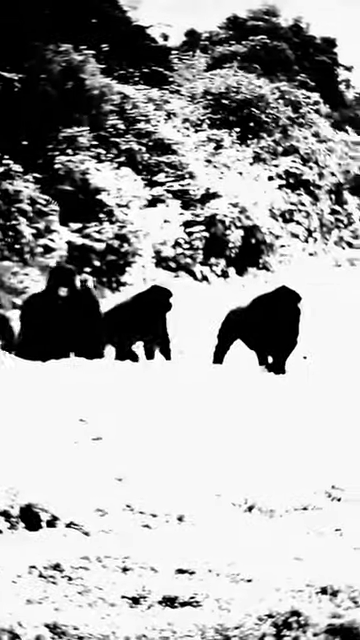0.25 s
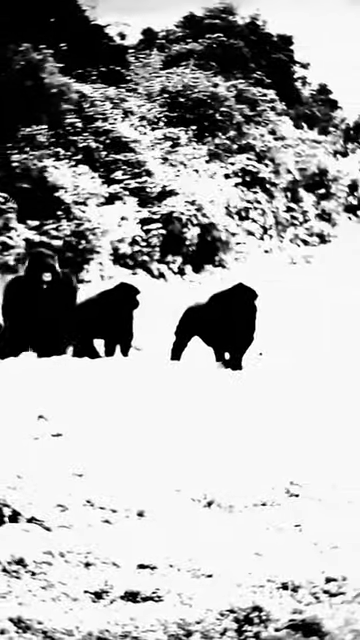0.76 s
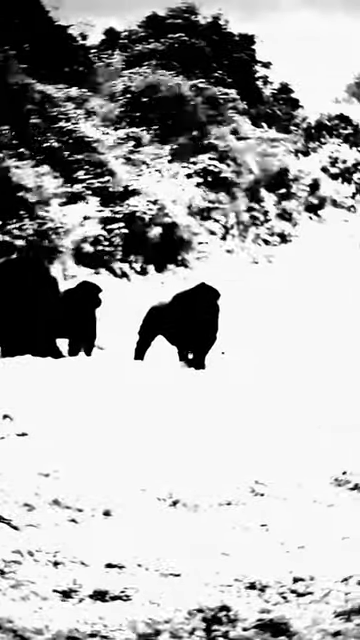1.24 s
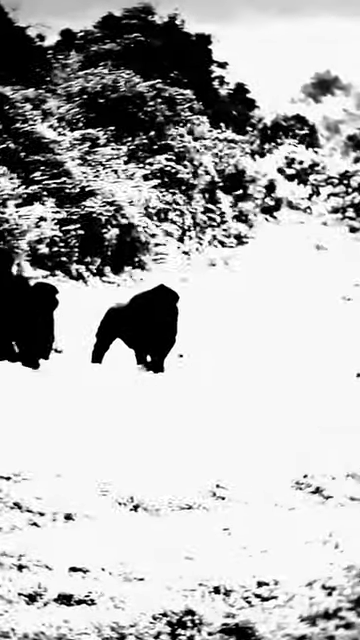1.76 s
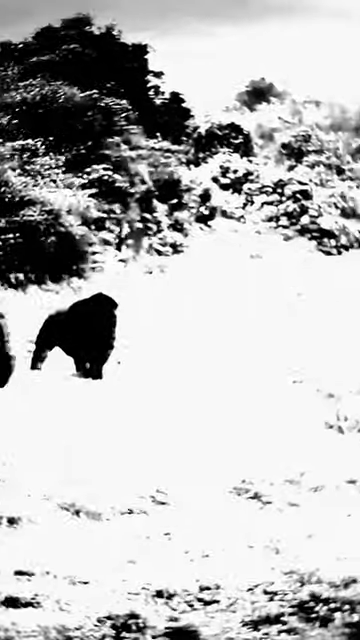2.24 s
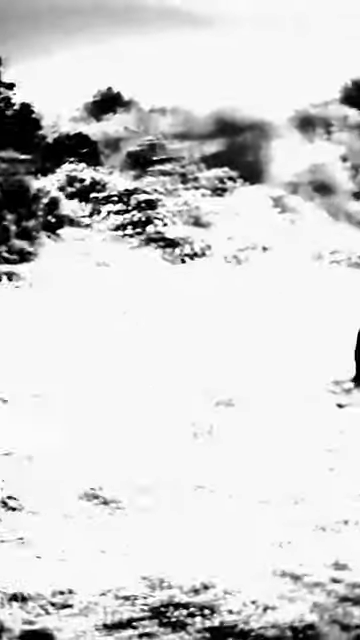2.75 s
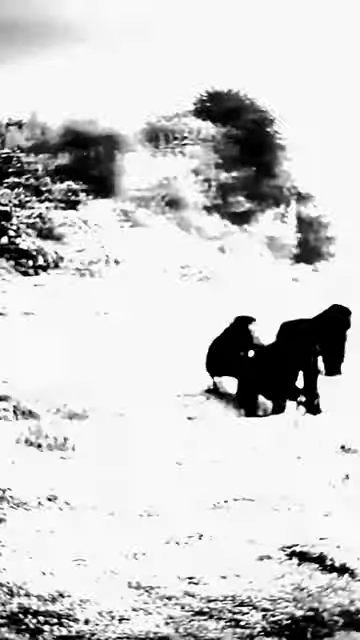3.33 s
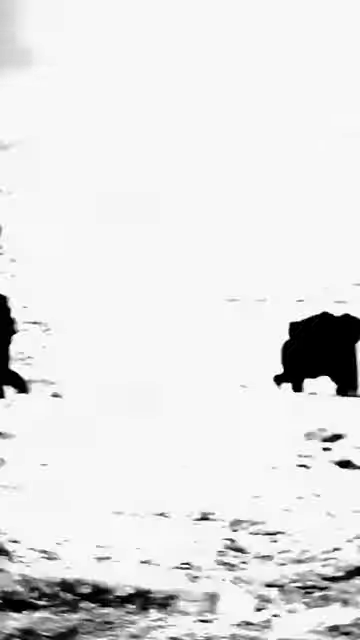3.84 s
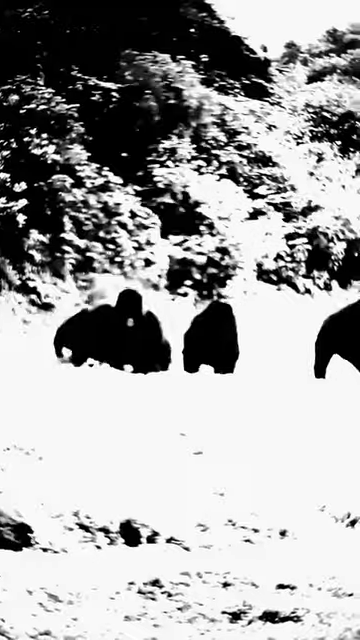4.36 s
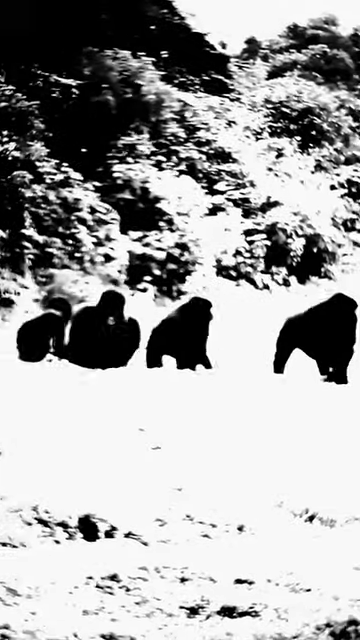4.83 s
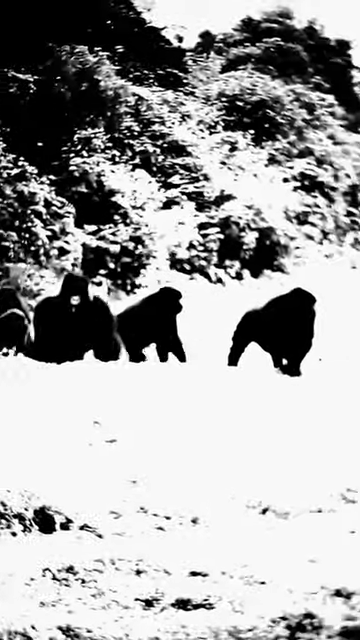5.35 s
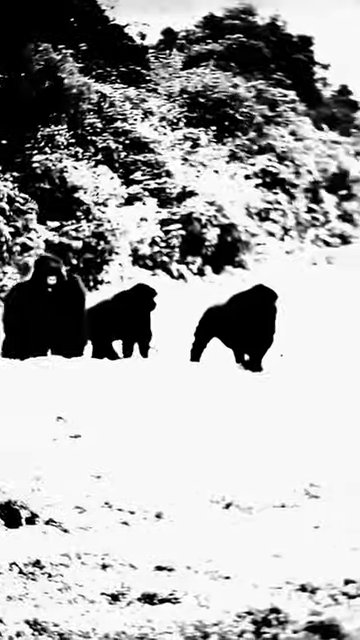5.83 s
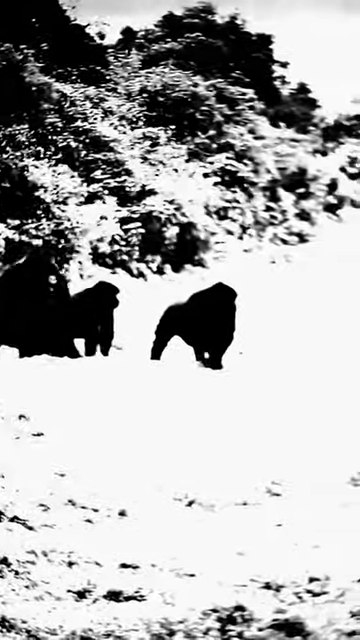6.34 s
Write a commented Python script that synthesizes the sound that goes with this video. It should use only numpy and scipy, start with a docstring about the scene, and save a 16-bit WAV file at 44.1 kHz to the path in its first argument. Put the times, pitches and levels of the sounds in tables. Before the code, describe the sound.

Outdoors, several gorillas argue: sharp raspy coughs and hoarse barks with brief whistling cracks, about two seconds of building calls, then two harsh nasal screams back to back. The outburst breaks into coughs, a thin whine and near quiet, before low grunts and a repeat of the opening barks. Grass rustles faintly, bushes return a dull weak echo, and the calls lean to the right of a stereo microphone.

```python
"""Gorillas quarrelling on open grass

Before a wall of bushes, coughing barks and hoarse hoots build into two long screams.
Each call is turbulent air, shaken by chaotic folds, ringing in a moving throat; the bushes return a faint echo.
The opening volley of barks comes round again at the end. A low hum and rumble lie underneath.
Everything skims the ground to two microphone ports, except the air bed and the scatter of nearby tufts."""
import sys
import numpy as np
from scipy import signal
from scipy.fft import rfft, irfft, next_fast_len
from scipy.io import wavfile
from scipy.ndimage import uniform_filter1d, minimum_filter1d

SR = 44100
rng = np.random.default_rng(int(sys.argv[2]) if len(sys.argv) > 2 else 0)


def persist_wave(psi):
    """Save psi, clipped to +-1, as 16-bit WAV."""
    counts = np.round(np.clip(psi, -1, 1) * 32767).astype(np.int16)
    wavfile.write(sys.argv[1], SR, np.atleast_2d(counts).T)


N = 290619
TIME = np.arange(N) / SR


def amp(db):
    """Decibels to gain."""
    return 10 ** (np.asarray(db) / 20)


def evened(x):
    """Scales to unit rms."""
    return x / np.sqrt(np.mean(x ** 2) + 1e-20)


def steadied(x, size=1100):
    """Unit rms from moment to moment, leaving the fast grain."""
    power = uniform_filter1d(uniform_filter1d(x ** 2, size), size // 2)
    return x / np.sqrt(power + 1e-12)


def read(points, hz):
    """Reads a spectrum table on a log-frequency axis."""
    f, value = np.transpose(points)
    return np.interp(np.log(hz + 1), np.log(f + 1), value)


def follow(rows):
    """Start time and the columns of a curve table, sample by sample."""
    s, *columns = np.transpose(rows)
    t = np.arange(s[0], s[-1], 1 / SR)
    return s[0], [np.interp(t, s, c) for c in columns]


def add(mix, s, sound):
    """Mixes a sound in at time s."""
    part = mix[max(round(s * SR), 0):][:len(sound)]
    part += sound[:len(part)]


def coloured(x, points):
    """Filters by a spectrum table."""
    size = next_fast_len(len(x) + 2048)
    gain = amp(read(points, np.fft.rfftfreq(size, 1 / SR)))
    return irfft(rfft(x, size) * gain, size)[:len(x)]


def faded(x, size=130):
    """Softens both ends of a sound over the given number of samples."""
    return x * signal.windows.tukey(len(x), min(1, 2 * size / len(x)))


def wander(n, rate_hz):
    """Smooth chance of about unit rms, up to about the given rate."""
    size = 2 ** int(np.ceil(np.log2(max(n, SR))))
    fall = np.exp(-(np.fft.rfftfreq(size, 1 / SR) / rate_hz) ** 2)
    return evened(irfft(rfft(rng.standard_normal(size)) * fall))[:n]


def turning(hz):
    """Phase in radians of a moving pitch."""
    return 2 * np.pi * np.cumsum(hz) / SR


def resonate(x, hz, width, order=2):
    """A moving resonance at steady level: shift hz down to zero, smooth, shift back."""
    turn = np.exp(1j * turning(hz * np.ones(len(x))))
    r = np.exp(-np.pi * width / SR)
    z = x / turn
    for _ in range(order):
        z = signal.lfilter([1 - r], [1, -r], z)
    return steadied((turn * z).real)


def rough_air(n, flutter_hz, flutter_db, pitch_hz=400, voiced=0., jitter=.075, drift_hz=27, tremor=0.0157):
    """Turbulence chopped into uneven puffs, mixed with the pulses of chaotic folds."""
    phase = turning(pitch_hz * (1 + jitter * wander(n, drift_hz) + tremor * wander(n, 248.7)))
    # the throat smears each pulse
    folds = evened(sum(np.cos(k * phase + k * k) for k in range(1, 14)))
    air = np.sqrt(1 - voiced) * rng.standard_normal(n) + 0.5345 * np.sqrt(voiced) * folds
    return air * amp(flutter_db * np.clip(wander(n, flutter_hz), -2, 2))


def husky(hz, level, width):
    """Rough air held in one narrow resonance."""
    air = rough_air(len(hz), flutter_hz=90, flutter_db=3)
    return faded(amp(level) * resonate(air, hz, width, order=3))


def swell(rise, hold, fall, edge_db=-30):
    """Level in dB of a short call, from edge_db under its peak: a rounded rise, a hold and an even fall."""
    t = np.arange(0, rise + hold + fall, 1 / SR)
    rising = np.maximum(1 - t / rise, 0) ** 1.76
    return edge_db * (rising + np.maximum(t - rise - hold, 0) / fall)


def arch(length, db, ends_db=-13):
    """Level in dB of a soft sound that is fullest in its middle."""
    return db + ends_db * np.linspace(-1, 1, int(length * SR)) ** 2


# Breath hissing at the teeth: freq_hz, level_db
HISS_SPECTRUM = [(3000, -34), (3700, 6.5), (4300, -0.5), (4900, -6.5), (5600, 2.5), (6300, -3.5),
                 (7000, -0.5), (7700, -8.5), (8500, -7), (9000, -20), (10300, -30.5), (12000, -40),
                 (15500, -45.5)]
# The chest heard through the body: freq_hz, level_db
CHEST_SPECTRUM = [(60, -42.5), (140, -20.5), (230, -3.5), (330, 1.5), (520, 3.5), (750, -6.5),
                  (1100, -11.5), (2000, -47.5)]


def call(controls, mouth_width, middle_hz, middle_width, upper_width, flutter_hz, flutter_db, pitch_hz,
         voiced, quiver, strain, mouth_db, middle_db, upper_db, edge_db, chest_db, hiss_db):
    """Rough air rings four throat resonances and the chest, and hisses past the teeth."""
    level, mouth_hz, upper_hz, mouth, upper, chest, hiss = controls
    n = len(level)
    air = rough_air(n, flutter_hz, flutter_db, pitch_hz, voiced)
    shake = 1 + quiver * wander(n, 58)  # the strained throat trembles
    throat = amp(mouth + mouth_db) * resonate(air, mouth_hz * shake, mouth_width, order=3)
    throat += amp(middle_db) * resonate(air[::-1], middle_hz * shake, middle_width, order=4)
    throat += amp(upper + upper_db) * resonate(air, upper_hz * shake, upper_width, order=3)
    # the fourth gives the bite
    throat += amp(upper + edge_db) * resonate(air[::-1], 1.2824 * upper_hz * shake, 910, order=3)
    # folds driven to their limit flatten the strongest surges
    surge = uniform_filter1d(steadied(throat) ** 2, size=60) + 0.28
    throat *= surge ** (-strain / 2)
    for spectrum, db in [(CHEST_SPECTRUM, chest + chest_db), (HISS_SPECTRUM, hiss + hiss_db)]:
        throat += amp(db) * steadied(coloured(rough_air(n, flutter_hz, flutter_db), spectrum))
    return faded(amp(level) * throat, size=220)


# As effort drops, mouth resonance, chest and hiss fade more slowly: dB kept per dB lost
MOUTH_KEEPS, CHEST_KEEPS, HISS_KEEPS = 0.153, 0.09, 0.033
FULL_EFFORT_DB = -21.5


def short_controls(rise, hold, fall, db, first_hz, last_hz, mouth, upper, chest, hiss,
                   first_upper_hz, last_upper_hz):
    """One push of air: the resonances glide, and the sound is duller at its soft ends."""
    effort = swell(rise, hold, fall)
    n = len(effort)
    mouth_hz = np.linspace(first_hz, last_hz, n)
    upper_hz = np.linspace(first_upper_hz, last_upper_hz, n)
    return (db + effort, mouth_hz, upper_hz, mouth - MOUTH_KEEPS * effort, upper,
            chest - CHEST_KEEPS * effort, hiss - HISS_KEEPS * effort)


# Open air around the microphone, shape only: freq_hz, level_db
AIR_SPECTRUM = [(59, -30.5), (100, 9), (127, 6.5), (158, -14), (212, -5), (417, -16.5), (647, -2),
                (913, -1), (1440, -9), (1880, -17), (2230, -11.5), (3150, -8), (4250, -33.5), (5520, -55),
                (9350, -120)]
# Low rumble, shape only: freq_hz, level_db
RUMBLE_SPECTRUM = [(10, -34), (25, -10.5), (37, -1), (50, -9), (90, -7.5), (150, -22.5), (400, -50),
                   (1000, -76.5)]
# Strength of the bed before trims: time_s, rumble_level_db, hum_level_db
BED_LEVELS = [(0.0, -53, -54), (1, -54.5, -59.5), (1.9, -57, -57), (2.7, -65, -61.5), (4.85, -76.5, -65),
              (5.1, -64.5, -58), (6.59, -61, -61.5)]


def background(air_db=-65, hum_hz=60.1, hum_trim_db=0.0, rumble_trim_db=-1):
    """Faint outdoor air, a low rumble and a wavering hum."""
    s, rumble_level, hum_level = np.transpose(BED_LEVELS)
    air = np.array([evened(coloured(rng.standard_normal(N), AIR_SPECTRUM)) for _ in range(2)])
    air *= amp(air_db) * amp([[-4], [3]])  # left, right
    shared, apart = (evened(coloured(rng.standard_normal(N), RUMBLE_SPECTRUM)) for _ in range(2))
    rumble = shared + .25 * np.array([apart, -apart])
    rumble *= amp(np.interp(TIME, s, rumble_level) + rumble_trim_db)
    hum = evened(np.sin(turning(hum_hz + 1.0 * wander(N, 5.3))) * amp(2 * wander(N, 7.6)))
    return air + rumble + amp(np.interp(TIME, s, hum_level) + hum_trim_db) * hum


# Grass and leaves, shape only: freq_hz, level_db
STIR_SPECTRUM = [(80, -10.5), (250, -3.5), (450, 0), (700, 2), (1400, 2.5), (1850, 0), (2400, 3),
                 (3200, 2.5), (3800, -5), (4700, -16), (5700, -9), (8400, -26), (9200, -34.5),
                 (15000, -37.5)]
# Stir of grass and leaves while the troop moves: time_s, level_db
STIR_LEVELS = [(0, -56.5), (0.36, -45.5), (0.55, -54.5), (0.78, -56.5), (1, -49), (1.68, -47.5),
               (1.82, -53.5), (1.95, -48.5), (3.85, -45), (4.37, -53), (4.48, -64), (4.9, -64.5),
               (5.1, -53.5)]


def stir():
    """A faint, uneven rustle of puffed noise in the colour of grass."""
    start, (level,) = follow(STIR_LEVELS)
    rustle = coloured(rough_air(len(level), flutter_hz=70, flutter_db=2.5), STIR_SPECTRUM)
    return start, faded(amp(level) * evened(rustle))


def slaps(n, rate_hz, depth_db, uneven=.35):
    """Level in dB of folds that slap shut at an uneven pace: each slap starts at once and dies away."""
    turns = np.cumsum(rate_hz * np.exp(uneven * wander(n, 60))) / SR
    return depth_db * uniform_filter1d(.45 - turns % 1, size=30)


# Sharp coughs led by the upper resonance; the four strengths are relative, before the call's offsets:
# start_s, rise_s, hold_s, fall_s, level_db, first_mouth_hz, last_mouth_hz,
# mouth_db, upper_db, chest_db, hiss_db, first_upper_hz, last_upper_hz
COUGH_CALLS = [ (0.005, 0.0433, .025, .095, -36, 707, 1200, -6.5, 5.64, -14.5, -0.5, 3194, 3060),
               (0.472, 0.0345, 0.031, 0.0663, -31.5, 1129, 1000, -3, 7.92, -6.5, 1, 2960, 3035),
               (1.192, 0.0335, .07, 0.083, -36.5, 653, 550.5, 9, 12.89, -22, -3, 3123, 2709),
               (1.922, .055, .03, 0.1573, -30.5, 977, 792, -5, 6.7, -5, -0.5, 2906, 2945),
               (3.73, .02, 0.0074, .1, -33, 1102, 903, -8.5, 7, -16, -7.5, 3120, 3170),
               (4.075, 0.029, 0.089, .02, -48, 1150, 1050, -3, 10.15, -17.5, -13, 3238, 3072),
               (4.22, 0.042, 0.014, 0.1234, -32.5, 890, 1103, -3, 9.65, -14.5, -1.5, 3177, 2877), ]


def cough(start, *shape):
    """A sharp, stuttering cough through bared teeth."""
    level, *throat = short_controls(*shape)
    level = level + slaps(len(level), rate_hz=75, depth_db=6)
    return start, call(
        (level, *throat), mouth_width=372, middle_hz=2295, middle_width=1790, upper_width=730,
        flutter_hz=130, flutter_db=1.2, pitch_hz=268.98, voiced=0.28, quiver=0.027, strain=0.15,
        mouth_db=-1.0, middle_db=1.5, upper_db=-2.5, edge_db=-13, chest_db=2, hiss_db=0.0)


# Brief ringing cracks of the voice: start_s, peak_db, pitch_hz, length_s
VOICE_CRACKS = [(0.015, -26, 3390, 0.00447), (0.043, -25, 3324, 0.0063), (0.06, -22, 3050, 0.0067),
                (0.182, -24, 1080, 0.0036), (0.215, -14, 1067, 0.00317), (0.2396, -20, 981, 0.0101),
                (0.479, -28, 3148, 0.0046), (0.4986, -15.5, 3110, 0.00834), (0.533, -23, 3046, 0.0099),
                (1.9498, -19, 2848, .005), (1.98, -14, 2787, 0.0148), (1.9927, -11.5, 2798, 0.0037),
                (3.749, -16.5, 3157, 0.0132), (4.2685, -12.5, 3177, 0.0054)]


def crack(s, db, hz, length, jitter=0.023, ring_share=0.3):
    """A few milliseconds of whistle: an abrupt start, a short hold and a quick ring-out."""
    t = np.arange(0, 3 * length, 1 / SR)
    ring_out = np.exp(-np.maximum(t / length - .6, 0) / ring_share)
    envelope = (1 - np.exp(-(t / 0.0022) ** 2)) * ring_out
    return s, amp(db) * envelope * np.sin(turning(hz * (1 + jitter * wander(len(t), 300))))


# Hoarse, rounded barks; the four strengths are relative, before the call's offsets:
# start_s, rise_s, hold_s, fall_s, level_db, first_mouth_hz, last_mouth_hz,
# mouth_db, upper_db, chest_db, hiss_db
BARK_CALLS = [ (0.168, 0.0562, 0.0385, 0.0757, -38, 1081, 971, 8, -9, -14, -16),
              (0.51, 0.0329, 0.0329, 0.0826, -29, 993, 994.4, 7, 1, -19.5, -15),
              (0.797, 0.0566, 0.0556, .09, -29.5, 920, 1250, 3.5, -9.5, -36, -21.5),
              (1.09, 0.0586, .04, 0.0966, -26, 1103, 1136, 1.5, 0, -31.5, -19.5),
              (1.382, .066, .05, .125, -23.5, 1139, 1180, -1.5, -3, -43.5, -26),
              (1.842, 0.0462, 0.0455, .07, -42, 1210, 1102, 1, -3, -11.5, -24.5),
              (3.89, 0.042, .09, 0.158, -39.5, 829, 1470, 4.5, 0, -12, -11), ]
BARK_UPPER_HZ = 3071
RATTLE_DB_PER_DB = 0.0614  # barks weaker than full effort flutter more


def bark(start, rise, hold, fall, db, *colour):
    """A hoarse bark through a half-open mouth; weak ones rattle."""
    controls = short_controls(rise, hold, fall, db, *colour, BARK_UPPER_HZ, BARK_UPPER_HZ)
    rattle = 0.79 + RATTLE_DB_PER_DB * (FULL_EFFORT_DB - db)
    return start, call(
        controls, mouth_width=460, middle_hz=2235, middle_width=1454, upper_width=560,
        flutter_hz=130, flutter_db=rattle, pitch_hz=268.6, voiced=0.28, quiver=0.026, strain=0.17,
        mouth_db=-0.5, middle_db=0.5, upper_db=-3.5, edge_db=-16.5, chest_db=2.5, hiss_db=1)


# Thin, husky whines: start_s, length_s, first_pitch_hz, last_pitch_hz, level_db
HUSKY_WHINES = [(0.259, 0.274, 1342, 1320, -40.5), (1.583, .29, 1372, 1360, -58.5),
                (3.919, .18, 1432, 1613, -37)]


def whine(start, length, first_hz, last_hz, db):
    """A thin, husky note: rough air in one gliding resonance."""
    level = arch(length, db)
    return start, husky(np.linspace(first_hz, last_hz, len(level)), level, width=230)


# Single swishes of grass: start_s, length_s, level_db, relative_hiss_db
GRASS_SWISHES = [(0.362, .035, -43, -14.5), (0.93, .035, -48, 2)]


def swish(start, length, db, hiss_db):
    """One brighter sweep through the grass."""
    level = arch(length, db)
    air = rough_air(len(level), flutter_hz=70, flutter_db=2.1)
    grass = evened(coloured(air, STIR_SPECTRUM))
    hiss = evened(coloured(air[::-1], HISS_SPECTRUM))
    return start, faded(amp(level) * (grass + amp(hiss_db) * hiss))


# Hollow pops that fall in pitch: start_s, peak_db, first_pitch_hz, last_pitch_hz, t60_s
HOLLOW_POPS = [(1.734, -43, 799, 339.6, 0.11), (4.693, -45, 1192, 692, 0.044),
               (5.0545, -22.5, 953, 432.7, 0.11)]


def pop(s, db, first_hz, last_hz, t60, glide_s=.007):
    """A cavity rings and sinks in pitch as it opens."""
    t = np.arange(0, t60, 1 / SR)
    hz = last_hz + (first_hz - last_hz) * np.exp(-t / glide_s)
    envelope = amp(db - 60 * t / t60) * (1 - np.exp(-t / 0.0011))
    return s, envelope * np.sin(turning(hz))


# Clear squeals: start_s, length_s, first_pitch_hz, last_pitch_hz, level_db
CLEAR_SQUEALS = [(2.021, 0.07, 1530, 1403, -41), (2.082, 0.081, 1400, 1386, -53),
                 (2.412, .31, 2256, 2029, -19), (2.91, 0.12, 2282, 2160, -41.5),
                 (3.586, .06, 1740, 1569, -28.5), (3.636, .028, 1606, 1896, -30.5),
                 (4.334, 0.141, 1464, 1441, -56)]


def squeal(start, length, first_hz, last_hz, db, jitter=0.025, flutter_db=4.0, octave_db=-27.5):
    """The folds lock briefly on one wavering pitch, with a weak octave."""
    level = arch(length, db)
    n = len(level)
    phase = turning(np.linspace(first_hz, last_hz, n) * (1 + jitter * wander(n, 240)))
    tone = np.sin(phase) + amp(octave_db) * np.sin(2 * phase)
    tone *= amp(flutter_db * wander(n, 110))
    return start, faded(amp(level) * evened(tone))


# Low grunts, before the grunt's own trims:
# start_s, rise_s, hold_s, fall_s, level_db, first_resonance_hz, last_resonance_hz, relative_rasp_db
LOW_GRUNTS = [ (2.085, .045, .012, 0.032, -25.5, 544, 429.8, -30),
              (2.16, .018, .005, .03, -30.5, 429.5, 393.5, -21),
              (3.745, .025, .005, .06, -37.5, 680, 464, -2), (4.918, .02, 0.022, .03, -45.5, 392, 400.3, 2),
              (4.95, .025, 0.011, 0.044, -35.5, 898, 710.3, 3),
              (4.975, .025, .045, .03, -37, 390.5, 435.3, -3.5),
              (5.056, .01, .005, .045, -31.5, 413, 357.4, -20), ]


def grunt(start, rise, hold, fall, db, first_hz, last_hz, rasp,
          width=480, chest_db=-3, rasp_db=-5, level_db=-1):
    """Uneven puffs through a nearly closed mouth, with chest below and rasp above."""
    level = db + swell(rise, hold, fall)
    hz = np.linspace(first_hz, last_hz, len(level))
    air = rough_air(len(hz), flutter_hz=140, flutter_db=3.5)
    voice = coloured(resonate(air, hz, width, order=3), [(50, -29), (190, -1.0)])
    voice += amp(chest_db) * steadied(coloured(air[::-1], CHEST_SPECTRUM))
    voice = steadied(voice) + amp(rasp + rasp_db) * resonate(air, 2627, 1000, order=4)
    return start, faded(amp(level + level_db) * voice)


# Whistling bands that tear in and out of a scream: centre_hz, level_relative_to_effort_db
TEAR_BANDS = [(1750, -14), (2250, -8), (3200, -11.5)]


def tears(effort, drift=.06, drift_hz=13, patchy_db=5, width=120):
    """Narrow bands that wander in pitch and come and go."""
    n = len(effort)
    bands = np.zeros(n)
    for hz, db in TEAR_BANDS:
        pitch_hz = hz * (1 + drift * wander(n, drift_hz))
        bands += husky(pitch_hz, effort + db + patchy_db * np.clip(wander(n, 21), -3, 1), width)
    return bands


# The two screams, one curve each; upper_db is relative, before the call's offset:
# time_s, effort_db, nasal_pitch_hz, middle_resonance_hz, upper_db
SCREAM_CURVES = [
    [(2.185, -43, 1077, 2290, -2), (2.207, -25.5, 1138, 2274, -3.5), (2.238, -17.5, 1227, 2259, -3),
     (2.315, -24, 1231, 2142, 1), (2.48, -17, 1231, 2294, 1), (2.59, -21, 1205, 2290, 3),
     (2.66, -26, 1223, 2193, 0.5), (2.73, -19, 1253, 2227, 1), (2.835, -16, 1267, 2309, -4),
     (2.885, -20.5, 1263, 2128, -4), (2.935, -46.5, 1262, 2182, -5)],
    [(3.07, -49, 788.4, 2258, -2.5), (3.145, -26, 774, 2170, -3), (3.215, -18, 795.7, 2185, -3.5),
     (3.33, -21.5, 1066, 2175, -1), (3.485, -17, 1252, 2132, -5.5), (3.535, -22.5, 1290, 2089, 4),
     (3.6, -24.5, 1238, 2163, -0.5), (3.627, -41.5, 1240, 2154, 6), (3.665, -20, 1224, 2100, -4.5),
     (3.75, -24, 1259, 2156, 1), (3.785, -44, 1204, 2150, 3.5)],
]
OPEN_HZ, SCREAM_UPPER_HZ = 1237, 3025
JAW_SHARE = .5  # how far the mouth resonance follows the nasal ring
# The mouth resonance starts this much stronger and fades as the jaw opens
JAW_OPENS_S, HALF_SHUT_DB = 0.189, 13
NASAL_DB = -20.5  # nasal ring, relative to effort plus mouth strength


def scream(*points):
    """A long scream: effort and the opening jaw shape the throat, and a narrow nasal ring moves through it."""
    start, (effort, ring_hz, middle_hz, upper) = follow(points)
    slack = FULL_EFFORT_DB - effort  # a slack voice keeps more of its mouth resonance, chest and hiss
    mouth = HALF_SHUT_DB * np.exp(-TIME[:len(effort)] / JAW_OPENS_S) + .2 * slack
    mouth_hz = OPEN_HZ + JAW_SHARE * (ring_hz - OPEN_HZ)
    controls = effort, mouth_hz, SCREAM_UPPER_HZ, mouth, upper, .6 * slack, 0.083 * slack
    voice = call(
        controls, mouth_width=606, middle_hz=middle_hz, middle_width=1005, upper_width=1015,
        flutter_hz=160, flutter_db=2.0, pitch_hz=429.46, voiced=0.586, quiver=0.0242, strain=0.26,
        mouth_db=-15.5, middle_db=-1.02, upper_db=-2.5, edge_db=-19, chest_db=-30, hiss_db=-22.5)
    nasal = husky(ring_hz, effort + mouth + NASAL_DB, width=170)
    return start, faded(voice + tears(effort) + nasal, size=500)


# Throbs of a low growl under the screams: start_s, length_s, level_db
GROWL_THROBS = [(2.373, 0.068, -40.5), (2.456, 0.058, -40), (2.565, .09, -37), (2.686, .11, -35.5),
                (2.8, .13, -42), (3.08, 0.19, -45.5), (3.46, .25, -49.5), (3.746, .07, -40),
                (3.909, .21, -44)]


def growl(start, length, db, flutter_hz=45, flutter_db=4.0):
    """Slow, lumpy puffs that ring in the chest."""
    level = arch(length, db, ends_db=-6)
    chest = coloured(rough_air(len(level), flutter_hz, flutter_db), CHEST_SPECTRUM)
    return start, faded(amp(level) * evened(chest), size=300)


def quarrel():
    """A volley of barks and coughs, two screams over a growl, then a last cough and grunts."""
    out = np.zeros(N)
    for source, table in [(cough, COUGH_CALLS), (crack, VOICE_CRACKS), (bark, BARK_CALLS),
                          (whine, HUSKY_WHINES), (swish, GRASS_SWISHES), (pop, HOLLOW_POPS),
                          (squeal, CLEAR_SQUEALS), (grunt, LOW_GRUNTS), (scream, SCREAM_CURVES),
                          (growl, GROWL_THROBS)]:
        for row in table:
            add(out, *source(*row))
    add(out, *stir())
    return out


def bushes(x, t60=0.987, build_s=0.046, level_db=-23):
    """Leaves and trunks scatter back a late, dull echo: sparse random taps that build up and die away."""
    t = TIME[:SR]
    taps = rng.standard_normal(SR) * (rng.random(SR) < 2500 / SR)
    taps *= amp(-60 * t / t60) * (1 - np.exp(-(t / build_s) ** 2))
    tail = coloured(taps / np.linalg.norm(taps), [
        (200, -1.0), (700, 2.5), (1000, -5.5), (1400, 8.0), (1900, -6.5), (2500, 2.5),
        (3300, -12.5), (4500, -9), (9000, -5)])  # Hz, dB
    return amp(level_db) * signal.fftconvolve(x, tail)[:N]


# Colour of the path over the ground: freq_hz, level_db
GROUND_COLOUR = [(100, -2), (400, -3), (720, 1), (1000, 3), (1270, 3), (1450, 4.5), (1600, 8.5),
                 (1800, 2.5), (2050, -1), (2300, 2), (2650, 4.5), (3250, 5.5), (3700, -0.5), (4200, 2.5),
                 (8000, 1.5)]
# Level between the two microphone ports: freq_hz, left_minus_right_db
LEFT_LEVEL = [(100, 3.5), (400, -3), (650, -0.5), (950, -8.5), (1750, -11), (2550, -9), (2850, -16.5),
              (3500, -10), (4300, -15.5), (4900, -8.5), (6400, -1.5), (7000, -9.5), (8100, 5.5), (8600, -1)]
# Phase between the two microphone ports: freq_hz, left_lead_radians
LEFT_LEAD = [(60, 0), (550, 0.41), (800, -1.77), (1050, -0.39), (1550, -0.9661), (1800, -5), (2050, -5.5),
             (2700, -5.5), (3200, -4.5), (4100, -4.5), (4900, -9), (6300, -8.5), (6900, -14.5), (8800, -11)]


def ports(x):
    """Sound skims the ground and reaches the two microphone ports with different level and phase."""
    size = next_fast_len(N + 4096)
    hz = np.fft.rfftfreq(size, 1 / SR)
    left = amp(read(LEFT_LEVEL, hz)) * np.exp(1j * read(LEFT_LEAD, hz))
    # the mean power of the two ports follows the ground colour alone
    right = rfft(x, size) * amp(read(GROUND_COLOUR, hz)) / np.sqrt((1 + abs(left) ** 2) / 2)
    return irfft(np.array([right * left, right]), size)[:, :N]


VOLLEY_AGAIN_S = 5.1082


def scene():
    """The calls, their echo and the open air."""
    calls = quarrel()
    troop = calls.copy()
    add(troop, VOLLEY_AGAIN_S, calls)  # only the opening volley fits before the end
    # nearby tufts scatter each call differently into each port
    scattered = np.array([bushes(troop, t60=0.091, build_s=0.0029, level_db=-11.5) for _ in range(2)])
    return ports(troop + bushes(troop)) + scattered + background()


EDGE_HZ = 15700  # top of the recorded band


def record(dry, ceiling_db=0.0):
    """A limiter eases the loudest peaks down; then a low-pass sets the band limit."""
    excess = np.minimum(1, min(amp(ceiling_db), 1) / (abs(dry).max(0) + 1e-9))
    gain = uniform_filter1d(minimum_filter1d(excess, size=200), size=200)
    lowpass = signal.firwin(511, EDGE_HZ, window=("kaiser", 9), fs=SR)
    return signal.oaconvolve(dry * gain, lowpass[None], "same")


dry = scene()
out = record(dry)
persist_wave(out)
```